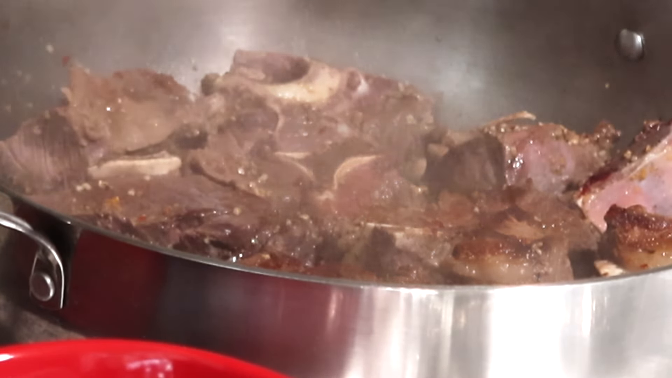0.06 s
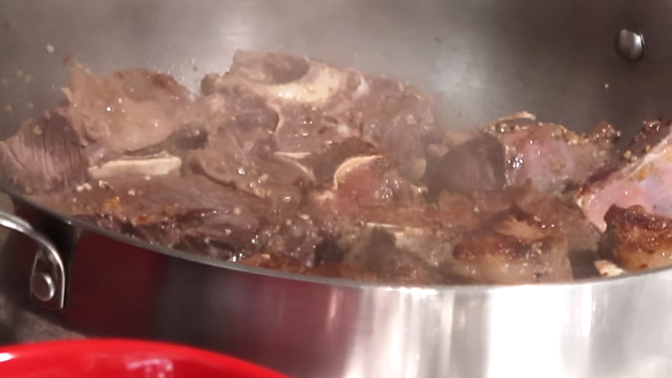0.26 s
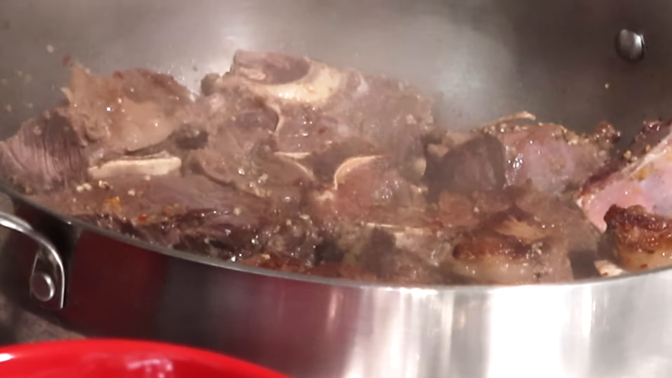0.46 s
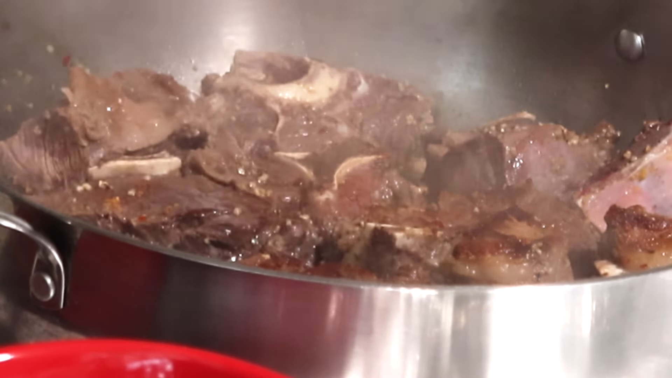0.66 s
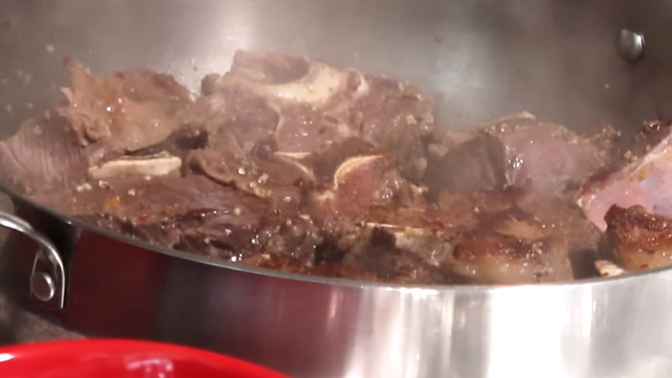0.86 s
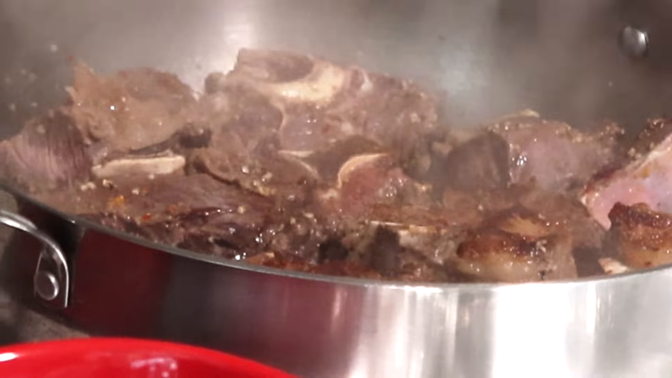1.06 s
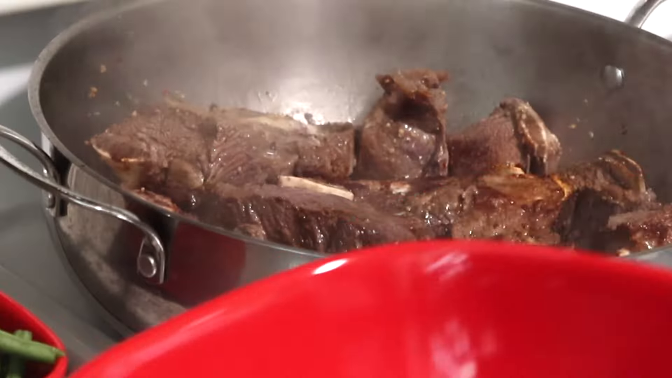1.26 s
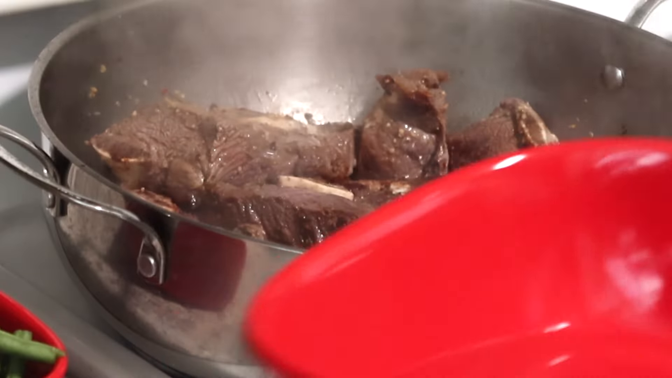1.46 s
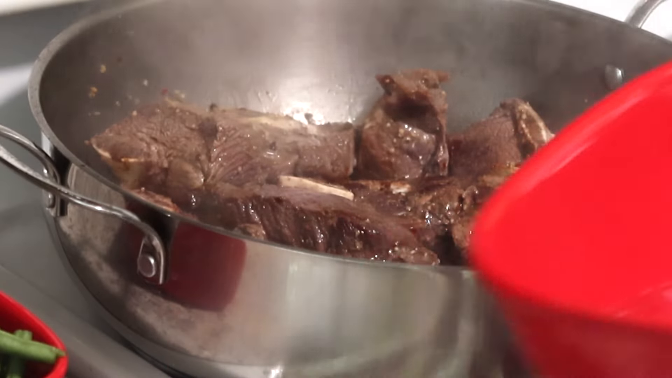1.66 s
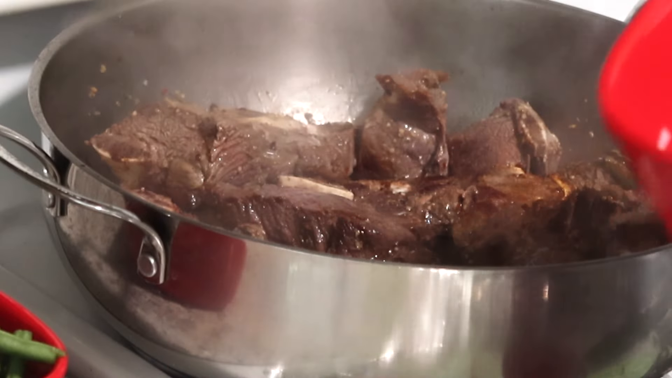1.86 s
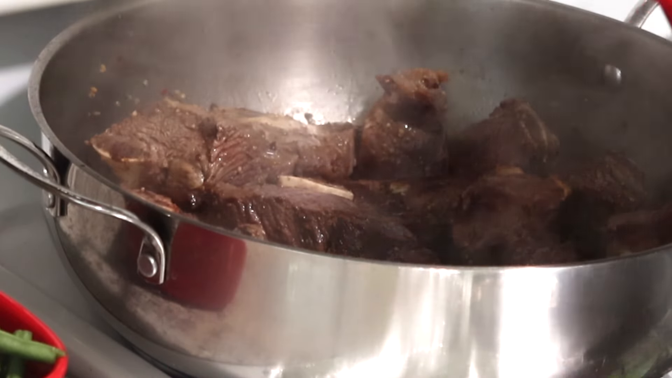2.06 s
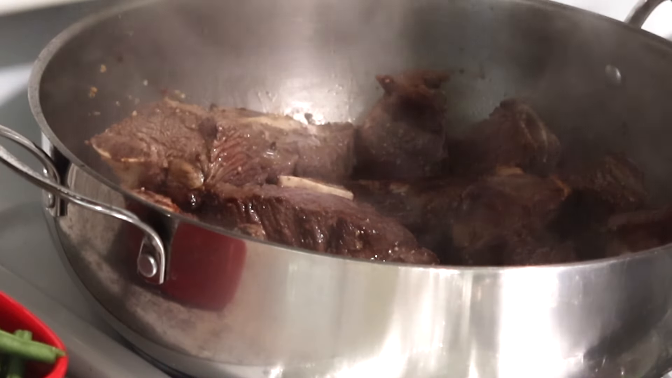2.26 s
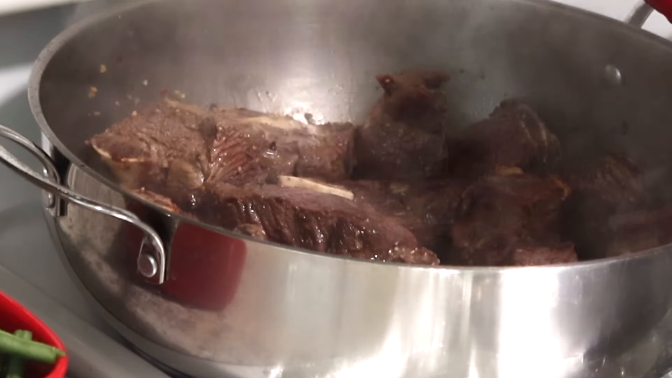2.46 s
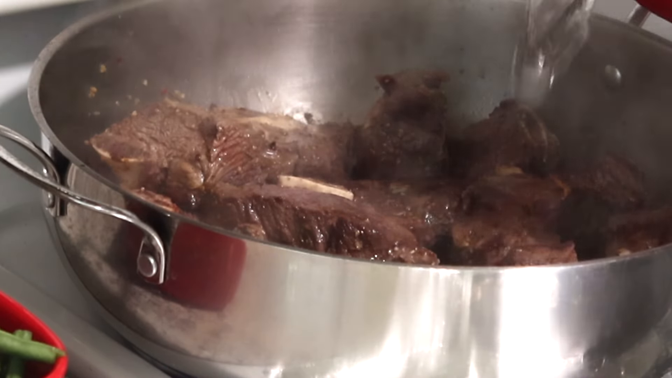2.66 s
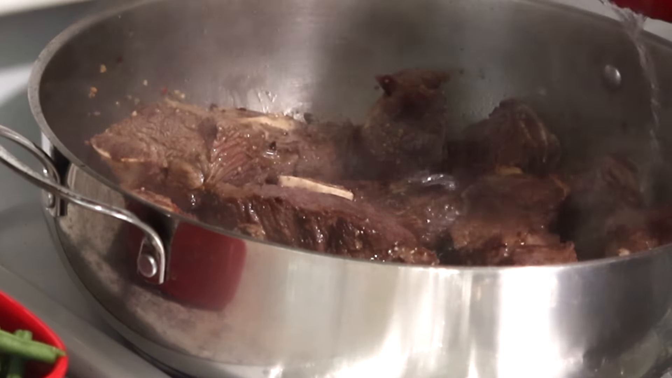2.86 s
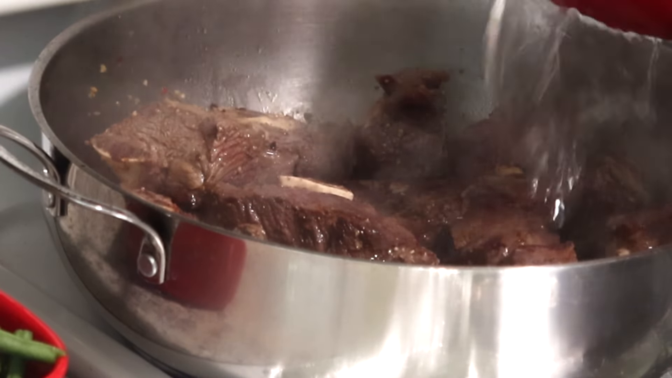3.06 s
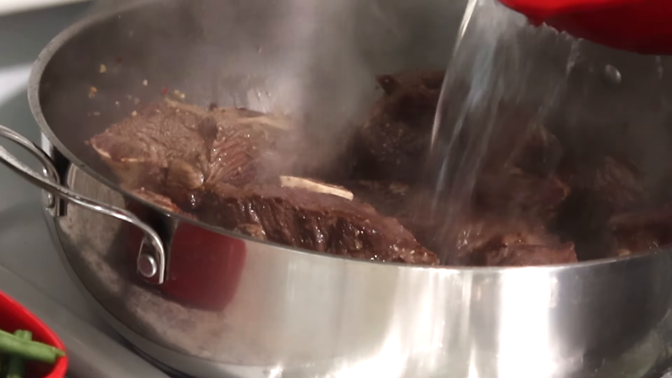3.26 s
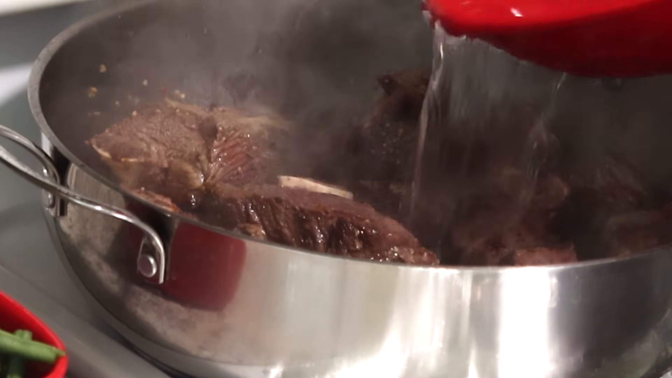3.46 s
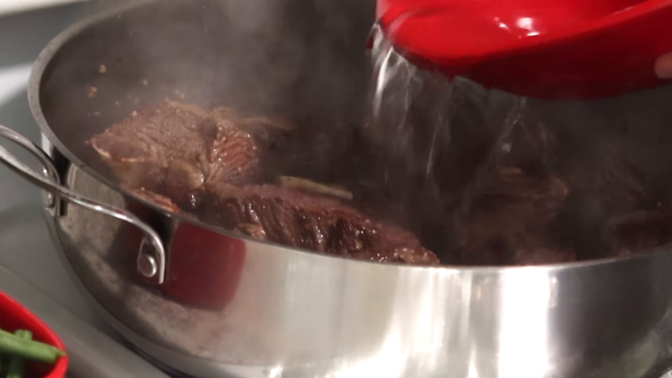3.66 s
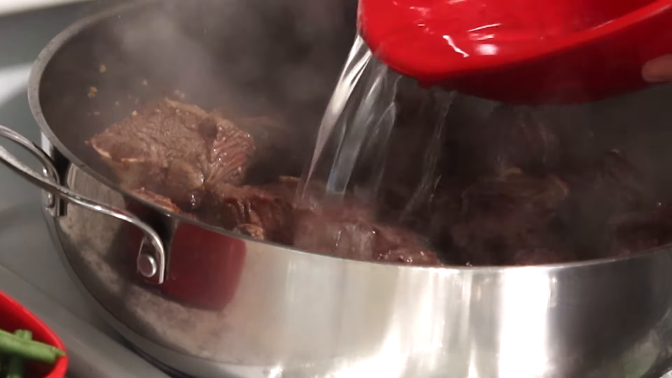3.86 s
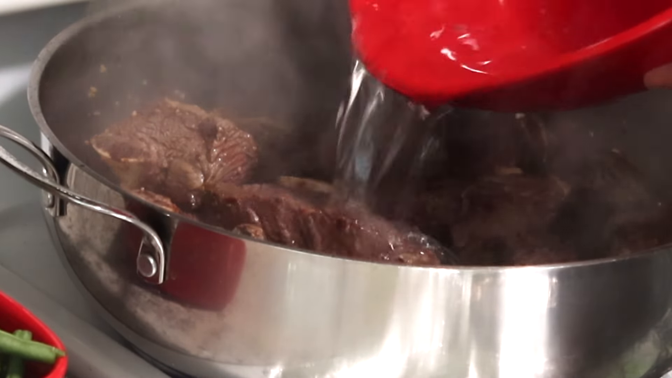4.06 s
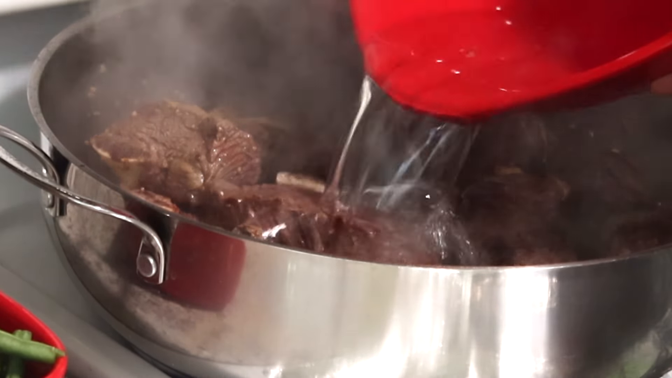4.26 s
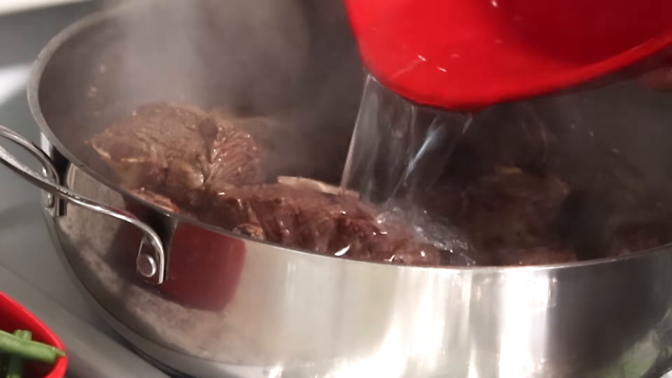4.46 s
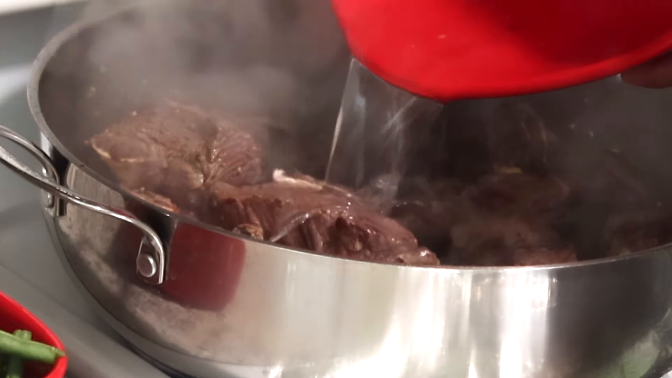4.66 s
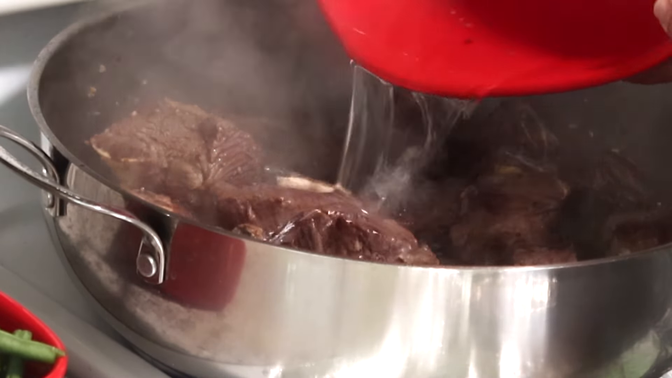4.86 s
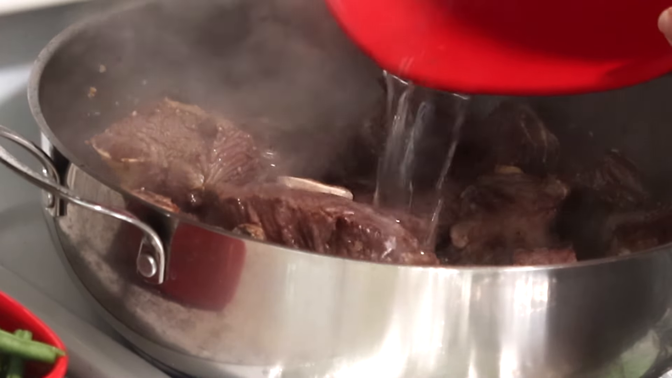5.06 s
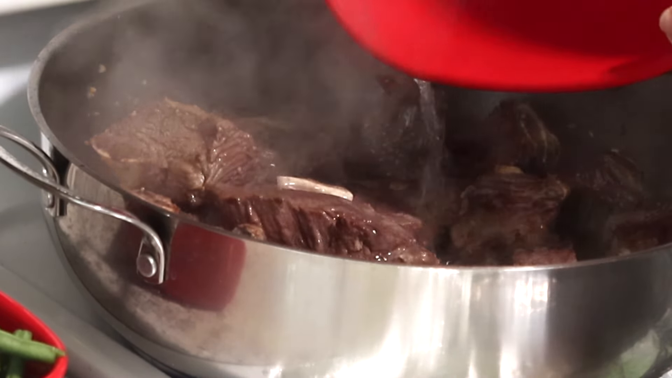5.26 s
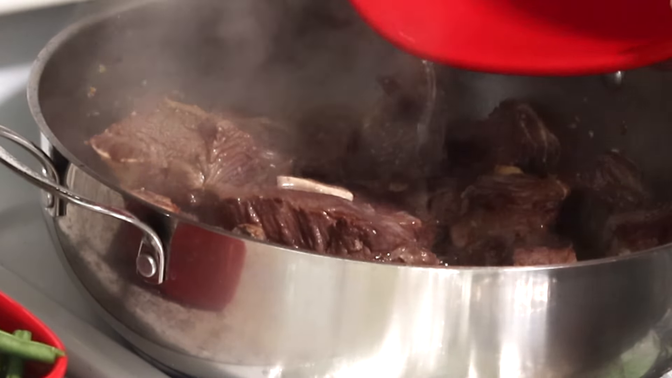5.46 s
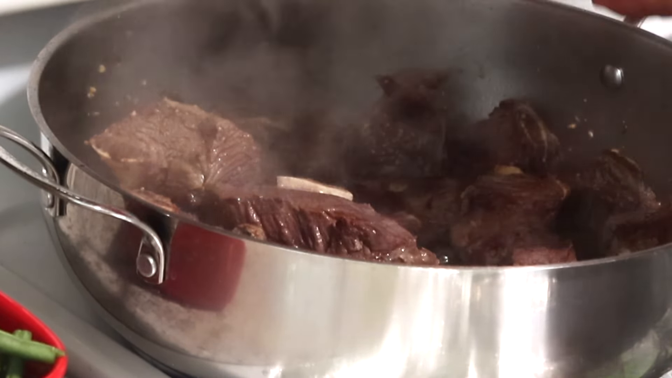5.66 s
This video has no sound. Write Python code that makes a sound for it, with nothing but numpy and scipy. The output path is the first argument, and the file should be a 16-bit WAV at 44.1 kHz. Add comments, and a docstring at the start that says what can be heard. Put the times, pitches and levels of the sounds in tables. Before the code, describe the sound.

Close mono pickup of meat frying in a wide steel pan in a small kitchen, over faint low hum. Soft bubbly sizzle and small spits stop for an instant, then return louder and brighter. Water pours in, flashing to a dense hissing boil with pops, before the sizzle dies back to low bubbling and dribbles.

```python
"""Meat is heard frying in a wide steel pan over a low hum; the sound drops out for an instant and returns brighter.
Water is poured in: it flashes to steam on hot metal, boils hard, then cools the pan to a low bubbling.
Random clicks become cracking steam blisters, damped bubble rings and the sprays of single spits.
Resonances of the hollow pan and the echoes of a small kitchen shape them; tones and filtered noise
make the hum and rumble. All is heard in mono from close by."""
import sys
import numpy as np
from scipy import signal
from scipy.fft import rfft, irfft, next_fast_len
from scipy.io import wavfile

SR = 44100
rng = np.random.default_rng(int(sys.argv[2]) if len(sys.argv) > 2 else 0)


def to_wav(s):
    """Save 16-bit WAV."""
    ch = np.atleast_2d(s).T  # columns
    pcm = np.round(np.clip(ch, -1, 1) * 32767)  # PCM
    wavfile.write(sys.argv[1], SR, pcm.astype(np.int16))


N = 251678


def from_db(db):
    """Logarithmic level law: 20 dB is a tenfold amplitude."""
    return 10 ** (np.asarray(db) / 20)


def rms_one(x):
    """Power normalisation: the root mean square becomes 1."""
    return x / np.sqrt(np.mean(x ** 2) + 1e-20)


def seconds():
    """Uniform sampling: the time of every sample."""
    return np.arange(N) / SR


def in_time(rows):
    """Linear interpolation: each column of a table as a curve, its end values held."""
    times_s, *columns = np.transpose(rows)
    return [np.interp(seconds(), times_s, column) for column in columns]


def drift(rate_hz):
    """Band-limited random fluctuation: straight lines between rate_hz chance values a second, rms 1."""
    knots = rng.standard_normal(4096)
    return rms_one(np.interp(seconds() * rate_hz, np.arange(len(knots)), knots))


def colour(x, spectrum):
    """Minimum-phase filtering: a causal response of the given spectrum keeps a click sharp in front."""
    size = 2 * next_fast_len(N)
    hz, db = np.transpose(spectrum)
    bins_hz = np.maximum(np.arange(size // 2 + 1) * SR / size, 1)
    gain = from_db(np.interp(np.log(bins_hz), np.log(hz), db))
    cepstrum = irfft(np.log(gain))
    # folding the cepstrum onto positive time yields the minimum phase
    response = np.exp(rfft(np.r_[0, 2 * cepstrum[1:size // 2]], size))
    return irfft(rfft(x, size) * response)[:N]


def resonate(x, resonances):
    """Resonance: a hollow lifts a narrow band at each of its modes."""
    for hz, width_hz, lift_db in resonances:
        band = signal.lfilter(*signal.iirpeak(hz, hz / width_hz, fs=SR), x)
        x = x + (from_db(lift_db) - 1) * band
    return x


def bursts(per_s, spread_db):
    """Poisson-like impulses: clicks at random moments, many small and a few large."""
    sizes = from_db(spread_db * np.minimum(rng.exponential(1, N), 6))
    signs = rng.choice([-1, 1], N)
    happens = rng.random(N) < per_s / SR
    return sizes * signs * happens / np.sqrt(per_s)   # the mean power does not depend on the rate


def kitchen(clicks):
    """Diffuse reverberation: wall echoes from all over the pan merge into noise that follows the dying energy."""
    t60_s, wet_db = 0.31, -3.5
    keep = from_db(-60 / (t60_s * SR)) ** 2
    energy = signal.lfilter([0, 1 - keep], [1, -keep], clicks ** 2 + 1e-18)
    return clicks + from_db(wet_db) * np.sqrt(energy) * rng.standard_normal(len(clicks))


def bubble_rings(clicks, low_hz, high_hz, cycles, count):
    """Damped oscillation: each click rings one bubble size, falling 60 dB in the given cycles."""
    dealt, out = rng.integers(0, count, N), np.zeros(N)
    for k, hz in enumerate(np.geomspace(low_hz, min(high_hz, SR / 3), count)):
        w = 2 * np.pi * hz / SR
        r = np.exp(-np.log(1000) * hz / (cycles * SR))
        echoed = kitchen(clicks * (dealt == k))   # so the pitch lingers in the room
        out += hz * signal.lfilter([1, -r * np.cos(w)], [1, -2 * r * np.cos(w), r * r], echoed)
    return out


# air resonances in the pan: (frequency [Hz], width [Hz], lift [dB])
PAN_MODES = [(310, 33, 5), (364, 25, 2), (494, 41, 6), (706, 30, 7), (805, 38, 6), (910, 43, 5.5),
             (1010, 21, 3), (1208, 40, 2.5), (1330, 45, 6), (1474, 36, 1.5), (1556, 55, 3), (1745, 39, 4.5),
             (1940, 72, 1.5), (2100, 82, 4), (2270, 80, 3.5), (3020, 51, 3.5), (3415, 70, 2),
             (4070, 110, 1.5), (4800, 240, 1), (5812, 80, 2.5), (6760, 300, 1.5), (7700, 120, 1)]


def heard(x, spectrum):
    """Source and resonator: bursts take the colour of their kind, then that of the hollow pan; rms 1."""
    return rms_one(resonate(colour(x, spectrum), PAN_MODES))


# mains and motor tones: (frequency [Hz], level [dB rms])
HUM_TONES = [(35, -58.5), (59.3, -53), (85, -59), (104.7, -47), (120.1, -44.5), (148.5, -58.5),
             (178.3, -57)]


def hum():
    """Periodic excitation: steady sines of mains and motors, each slightly wandering in phase."""
    tones = np.zeros(N)
    for hz, db in HUM_TONES:
        phase = 2 * np.pi * (hz * seconds() + rng.random()) + 0.27 * drift(3.6)
        tones += from_db(db) * np.sqrt(2) * np.sin(phase)
    return tones


# colour of the kitchen rumble: (frequency [Hz], relative level [dB per Hz])
RUMBLE_SPECTRUM = [(15, -28), (32, -22), (46, 0), (62, 7), (95, -3), (135, 3.5), (170, -3.5), (250, -6),
                   (500, -14.5), (1500, -32.5)]
# swell of the rumble: (time [s], lift [dB])
RUMBLE_LIFT = [(0.82, -3), (1.02, 3), (1.17, 0), (1.25, -2)]


def rumble():
    """Filtered broadband noise: a soft low background that swells briefly."""
    swell_db, = in_time(RUMBLE_LIFT)
    return from_db(-41 + swell_db) * rms_one(colour(rng.standard_normal(N), RUMBLE_SPECTRUM))


# the fat livens up and eases again: (time [s], lift [dB])
VIGOUR = [(0, -1.2), (0.26, -0.7), (0.42, 0.5), (0.8, 0.4), (0.95, -0.6), (1.2, -0.1), (2.7, 0.4)]


def activity(fry_db, pour, at_rim):
    """Heat balance: burst level [dB] follows the frying, rises with the pour, holds, and falls with cooling."""
    pour_s = 2.79       # the water first meets the steel
    rise_shape = 1.6    # above 1: quick at first, then levelling off
    rise_s, top_db, cooling_s, fall_db_per_s = pour
    t = seconds()
    vigour_db, = in_time(VIGOUR)
    frying_db = np.where(at_rim, *fry_db) + vigour_db
    still_dry = np.clip(1 - (t - pour_s) / rise_s, 0, 1) ** rise_shape
    cooling_db = fall_db_per_s * np.maximum(t - cooling_s, 0)
    return top_db + still_dry * (frying_db - top_db) - cooling_db


# colour of the sizzle: (frequency [Hz], relative level [dB per Hz])
SIZZLE_SPECTRUM = [(600, -17.5), (1500, -9.5), (2800, -6), (4000, -0.5), (5500, -2.5), (7000, -2.5),
                   (9500, -6.5), (12000, -11.5), (14000, -16), (16000, -19)]


def sizzle(level_db, darkening):
    """Impulsive noise: tiny steam blisters crack by the thousand, denser and brighter in a hotter fry."""
    heat_db = level_db - np.max(level_db)
    cracks = rms_one(kitchen(bursts(15000 * from_db(.7 * heat_db), spread_db=2.0)))
    steam = from_db(-4) * rng.standard_normal(N)
    fry = heard(cracks + steam, SIZZLE_SPECTRUM)
    # the finest cracks weaken with cooling and with darkening
    finest = signal.sosfilt(signal.butter(1, 7500, "high", fs=SR, output="sos"), fry)
    finest_db = 0.076 * heat_db - 7.6 * darkening ** 2 + 1.4
    fry = fry + (from_db(finest_db) - 1) * finest
    return fry * from_db(level_db + 0.72 * drift(45) + 0.92)


# colour of the boil: (frequency [Hz], relative level [dB per Hz])
BOIL_SPECTRUM = [(600, -18.5), (1200, -13.5), (1500, -3), (2250, -3), (2800, -3), (3800, -9), (6000, -15),
                 (12000, -46)]


def boil(level_db):
    """Strongly damped bubble oscillation: small bubbles of flashing water, denser when louder."""
    per_s = 11000 * from_db(.6 * (level_db - np.max(level_db)))
    rings = bubble_rings(bursts(per_s, spread_db=2.0), low_hz=693, high_hz=9500, cycles=7.4, count=20)
    return heard(rings, BOIL_SPECTRUM) * from_db(level_db + .5 * drift(45))


# colour of larger bubbles in the juices: (frequency [Hz], relative level [dB per Hz])
BUBBLE_SPECTRUM = [(150, -16.5), (280, -9.5), (400, -5), (500, 1), (750, 0.5), (1100, -2), (1600, -4.5),
                   (3000, -24.5)]
# colour of the lowest bubbles: (frequency [Hz], relative level [dB per Hz])
LOW_BUBBLE_SPECTRUM = [(130, -10), (200, 0), (330, -5), (450, 7), (620, -8), (1000, -22)]


def simmer(level_db, darkening):
    """Bubble size sets pitch: larger bubbles ring low, and darkening gives the lowest more weight."""
    larger = bubble_rings(bursts(4000, spread_db=2.0), low_hz=191.4, high_hz=2200, cycles=11.7, count=24)
    lowest = bubble_rings(bursts(1400, spread_db=3.0), low_hz=147, high_hz=850, cycles=7.1, count=12)
    lowest = from_db(-7) * darkening ** 2 * heard(lowest, LOW_BUBBLE_SPECTRUM)
    return (heard(larger, BUBBLE_SPECTRUM) + lowest) * from_db(level_db - 2.3)


# single spits of fat and water: (time [s], relative level [dB], pitch [Hz])
SPIT_EVENTS = [(0.213, -14, 2100), (0.328, -15, 1010), (0.345, -20, 2100), (0.608, -22, 1648),
               (0.803, -17, 1300), (3.335, -14, 2300), (3.431, -9, 2000), (3.521, -10, 2100),
               (3.661, -19, 1800), (3.911, -19, 1700), (4.185, -12, 6000), (4.316, -12.5, 2200),
               (4.407, -9, 6000), (4.638, -13, 6500), (4.955, -16, 650), (5.378, -17, 1000),
               (5.545, -20, 546)]


def spits(decay_s, crack_db):
    """Impulse and decaying noise: a trapped drop bursts with a crack, then a short spray around its pitch."""
    out, t = np.zeros(N), np.arange(SR // 4) / SR
    for s, db, hz in SPIT_EVENTS:
        spray = rng.standard_normal(len(t)) * np.exp(-t / decay_s)
        spray[0] += from_db(crack_db)
        spray = signal.lfilter(*signal.iirpeak(hz, 1.2, fs=SR), kitchen(spray)) * np.sqrt(SR / hz)
        start = round(s * SR)
        out[start:start + len(t)] += from_db(db) * spray[:N - start]
    return from_db(-16) * resonate(out, PAN_MODES)


def surges(rows, attack_s, decay_s):
    """Attack and exponential decay: summed event envelopes, one curve in dB per column of lifts."""
    times_s, *lifts_db = np.transpose(rows)
    age_s = seconds() - times_s[:, None]
    attack = np.clip(1 + age_s / attack_s, 0, 1)
    decay = np.exp(-np.maximum(age_s, 0) / decay_s)
    return np.array(lifts_db) @ (attack * decay)


# water or juice reaches bare hot steel: (time [s], sizzle lift [dB], boil lift [dB])
GUSH_EVENTS = [(0.34, 1.2, 2), (0.58, 0.3, 1.5), (0.82, 0.3, 2), (2.0, 0.3, 2.5), (3.05, 0.3, 2),
               (3.18, 2, 1.5), (3.53, 1.5, 3), (4.18, 1.8, 1), (4.39, 1, 2), (4.63, 2, 0.5), (4.98, 2.2, 1)]


def gushes():
    """Flash boiling: each gush on bare steel lifts sizzle and boil for a moment."""
    return surges(GUSH_EVENTS, attack_s=0.04, decay_s=0.09)


# the thinning stream breaks into dribbles that stir the pool: (time [s], lift [dB])
DRIBBLE_EVENTS = [(5.28, 2.5), (5.38, 4), (5.54, 2.5), (5.61, 4.2)]


def dribbles():
    """Agitation: each dribble stirs the pool and briefly lifts its bubbling."""
    lift_db, = surges(DRIBBLE_EVENTS, attack_s=0.025, decay_s=0.04)
    return lift_db


def lull():
    """Gaussian amplitude dip, in dB: the boiling falters between two dribbles."""
    centre_s, width_s, dip_db = 5.48, 0.04, -5
    return dip_db * np.exp(-((seconds() - centre_s) / width_s) ** 2)


# darkening of the sizzle and weight of the lowest bubbles, first value held from the start:
# (time [s], amount [0-1])
DARKENING = [(3.7, 0.72), (4.5, 0.64), (5.15, 1), (5.7, 1)]
# bursts follow the pour: (rise [s], top level before trim [dB], cooling starts [s], fall [dB per s])
SIZZLE_POUR = (1.4, -21.8, 4.74, 16.8)
BOIL_POUR = (1.15, -20.4, 4.46, 10.9)
BUBBLE_POUR = (2.2, -25.8, 4.78, 6.8)
# further resonances of the pan, heard throughout: (frequency [Hz], width [Hz], lift [dB])
FURTHER_PAN_MODES = [(628, 26, 4), (1075, 125, 3.5), (1205, 41, 3.5), (4570, 610, 1)]
# resonances heard only at first, beside the rim: (frequency [Hz], width [Hz], lift [dB])
RIM_MODES = [(298, 24, 8.5), (910, 70, 3.5), (2300, 760, 2), (7950, 2400, 2)]


def scene():
    """Superposition: all sources in the pan and the room add, alike in both channels."""
    at_rim = seconds() < DROPOUT[2][0]   # the microphone moves from the rim to over the pan in the silence
    darkening, = in_time(DARKENING)
    gush_sizzle_db, gush_boil_db = gushes()
    dribble_db = dribbles()
    # steady frying levels before trim: (at the rim [dB], over the pan [dB])
    sizzle_db = activity((-30.2, -23.6), SIZZLE_POUR, at_rim) + gush_sizzle_db + 0.3 * dribble_db
    boil_db = activity((-32.4, -31.4), BOIL_POUR, at_rim) + gush_boil_db + dribble_db + lull()
    bubble_db = activity((-36.8, -41.3), BUBBLE_POUR, at_rim) + dribble_db
    cooking = sizzle(sizzle_db, darkening) + boil(boil_db) + simmer(bubble_db, darkening)
    cooking = cooking + spits(decay_s=0.0079, crack_db=15)
    cooking = resonate(cooking, FURTHER_PAN_MODES)
    beside_rim = from_db(-0.5) * resonate(cooking, RIM_MODES)
    mono = np.where(at_rim, beside_rim, cooking) + hum() + rumble()
    return np.array([mono, mono])


# the sound drops out and returns: (time [s], gain [linear])
DROPOUT = [(1.170, 0.88), (1.172, 0.096), (1.183, 0.0014), (1.248, 0), (1.259, 0.96)]


def record(dry):
    """Gating and low-pass filtering: a moment of silence, and a steep cut of the top."""
    gain, = in_time(DROPOUT)
    low_pass = signal.ellip(12, .1, 90, 15750, fs=SR, output="sos")   # cutoff in Hz
    return signal.sosfilt(low_pass, dry * gain)


dry = scene()
out = record(dry)
to_wav(out)
```